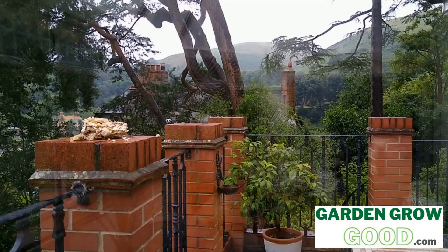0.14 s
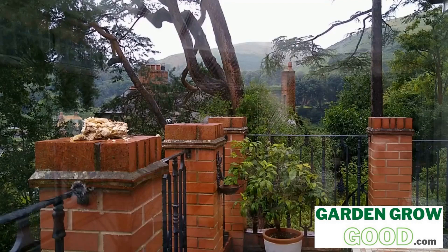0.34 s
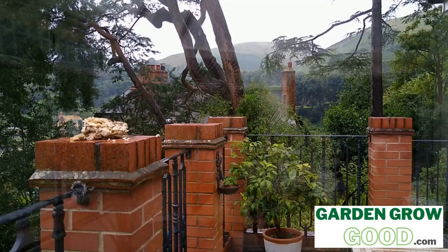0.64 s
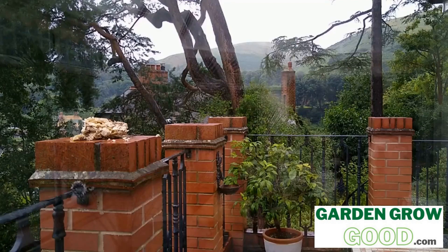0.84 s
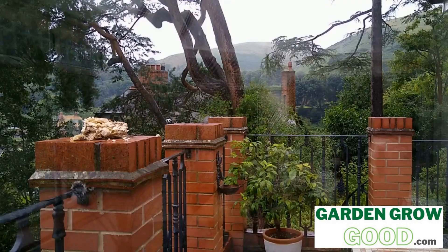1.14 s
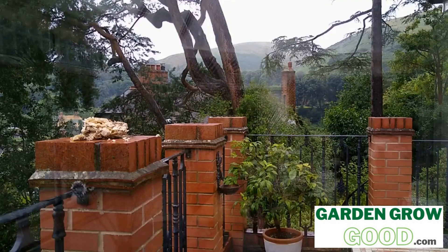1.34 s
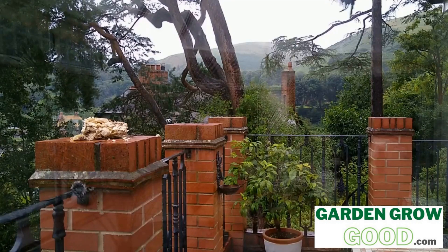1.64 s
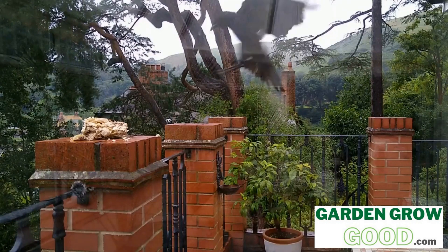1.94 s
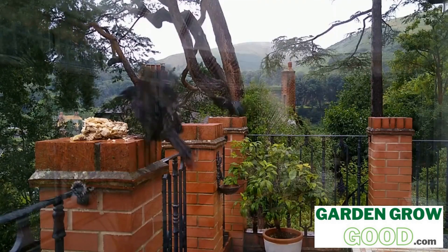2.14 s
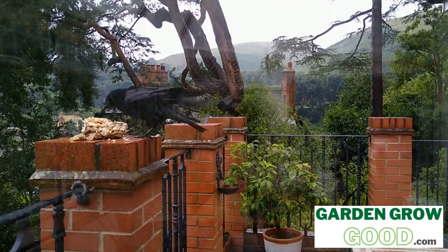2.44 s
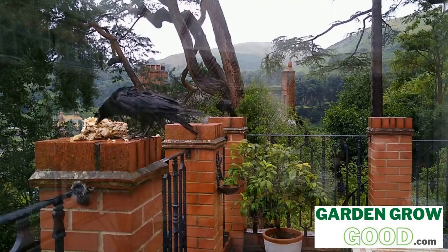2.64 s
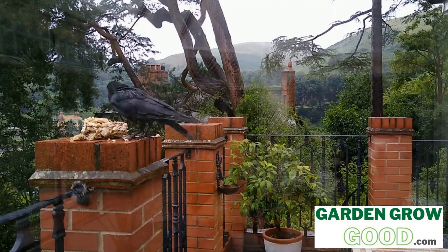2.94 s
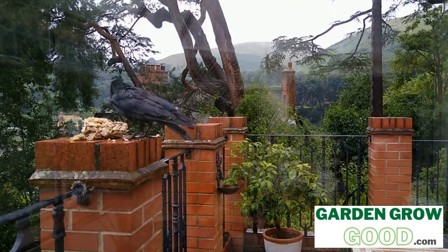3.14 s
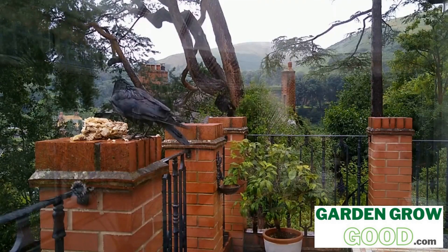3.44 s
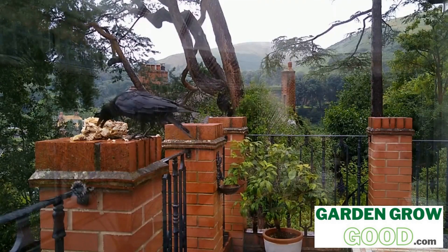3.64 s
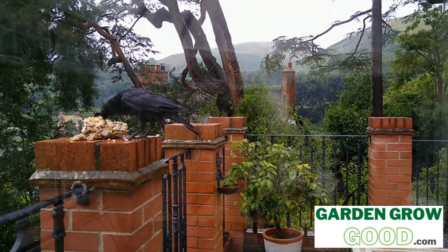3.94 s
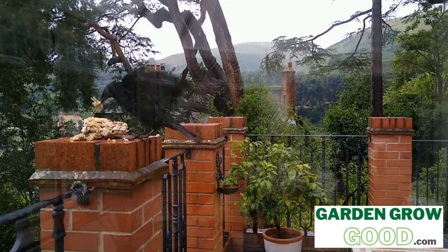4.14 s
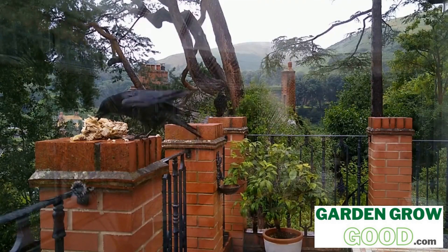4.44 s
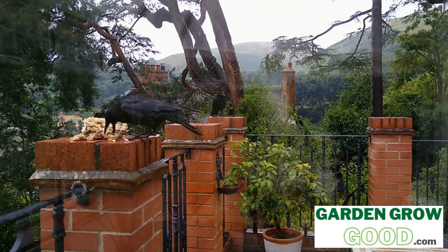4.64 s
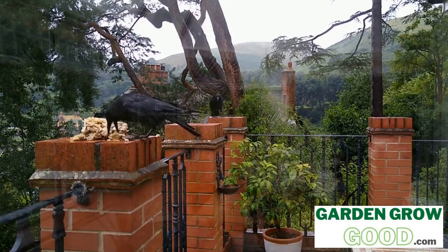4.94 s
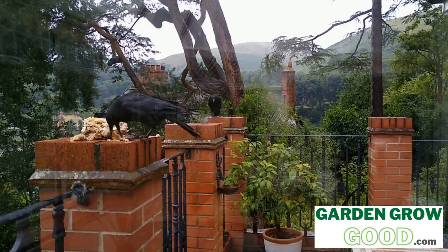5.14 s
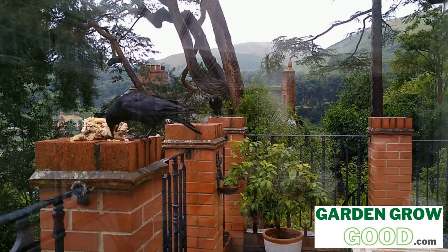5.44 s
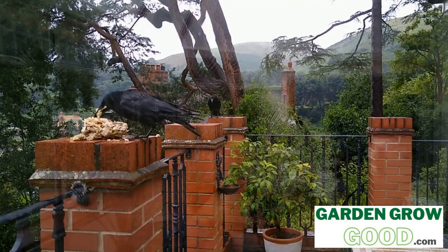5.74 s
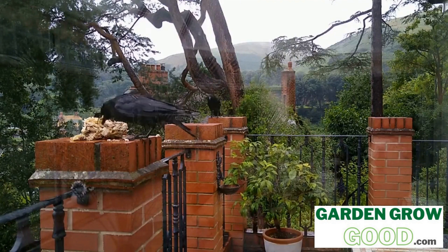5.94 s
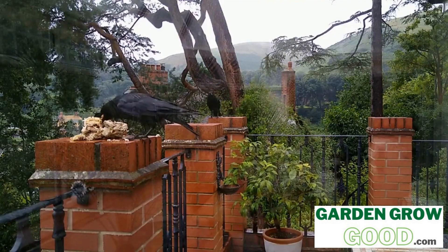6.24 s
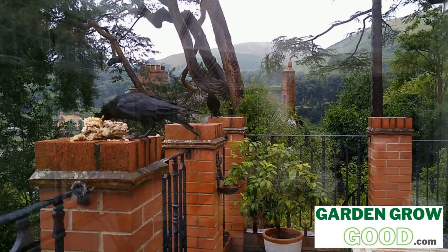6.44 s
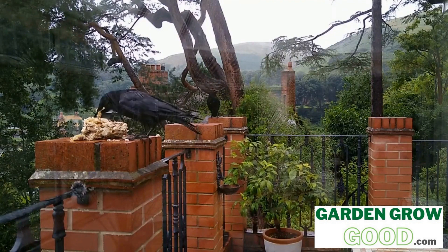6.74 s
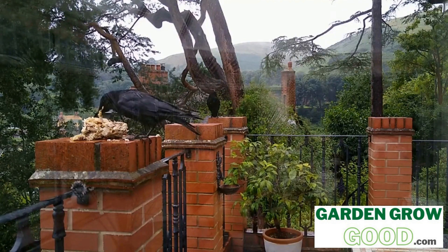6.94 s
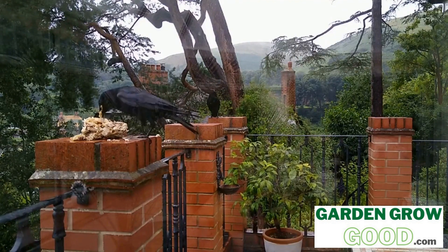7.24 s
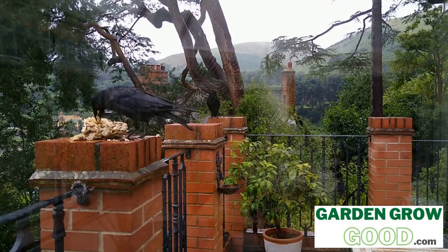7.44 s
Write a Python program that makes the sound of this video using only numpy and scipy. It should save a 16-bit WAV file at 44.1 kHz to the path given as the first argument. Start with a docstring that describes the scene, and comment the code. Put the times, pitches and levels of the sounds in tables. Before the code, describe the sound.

Outdoors, with a soft low wash of valley air and tiny birds trilling far away among trees, a crow calls twice, rough and strong, the caws ringing slightly in the woods. It flutters in close with airy thumps and feather swishes, folds its wings, then picks at crumbly food in sparse, faint, sharp ticks. The caws are by far the loudest sounds.

```python
"""Over the low hum of the valley, with small birds singing far off among the trees, a crow caws twice
in a hillside garden: rough pulses sound through moving resonances. It then flaps down onto a brick
pillar near the microphone, in bursts of low and bright noise, and its feathers rustle as the wings close.
Last it pecks at dry food scraps, in clusters of tiny noise cracks, and tears one loose.
The far birds are gliding sine tones; the hum is filtered noise."""
import sys
import numpy as np
from scipy import signal
from scipy.fft import rfft, irfft
from scipy.io import wavfile
from scipy.ndimage import uniform_filter1d

SR = 44100
rng = np.random.default_rng(int(sys.argv[2]) if len(sys.argv) > 2 else 0)


def wav_record(signal):
    """Record a signal, one row per channel, as 16-bit PCM in the file named by sys.argv[1]."""
    frames = np.transpose(np.atleast_2d(signal))
    bounded = np.clip(frames, -1, 1)
    # unit amplitude maps onto the largest positive 16-bit level
    quanta = np.round(bounded * 32767).astype(np.int16)
    wavfile.write(sys.argv[1], SR, quanta)


N = 335160
TIME = np.arange(N) / SR


def gain_of(db):
    """Turns decibels into an amplitude factor."""
    return 10 ** (np.asarray(db) / 20)


def evened(x):
    """Scales to rms 1."""
    return x / np.sqrt(np.mean(x ** 2) + 1e-20)


def read(points, hz):
    """Reads a curve of (frequency, value) points on a log-frequency axis."""
    f, value = np.transpose(points)
    return np.interp(np.log(hz + 1), np.log(f + 1), value)


def add(mix, s, sound):
    """Mixes a sound in at a time in seconds."""
    part = mix[max(round(s * SR), 0):][:len(sound)]
    part += sound[:len(part)]


def coloured(x, points):
    """Filters x by a spectrum in dB and scales it to rms 1."""
    gain = gain_of(read(points, np.fft.rfftfreq(len(x), 1 / SR)))
    return evened(irfft(rfft(x) * gain, len(x)))


def wander(count, hz):
    """Random drift, mostly slower than a given rate, rms 1."""
    f = np.fft.rfftfreq(count, 1 / SR)
    lowpass = (f > 0) / (1 + (f / hz) ** 2) ** 2
    return evened(irfft(rfft(rng.standard_normal(count)) * lowpass, count))


def bell(s, length):
    """A smooth rise and fall of height 1 around a time."""
    return np.exp(-2 * ((TIME - s) / length) ** 2)


def patches(shape, size):
    """Random blotches over frequency and time, rms 1."""
    across_frequency = uniform_filter1d(rng.standard_normal(shape), size[0], 0)
    return evened(uniform_filter1d(across_frequency, size[1], 1))


def valley_and_low_air():
    """A soft wash of distant air and roads, over a lumpy low rumble that also carries the wings' push."""
    # colour of the wash: (frequency [Hz], level [dB])
    wash_colour = [(12, -48), (20, -26), (31, -14), (53, -1.5), (137, -2.5), (202, -5), (252, -5.5),
                   (298, -4.5), (382, -3.5), (416, -6), (631, -5.5), (1720, -17.5), (3450, -23),
                   (11400, -27), (15500, -26.5)]
    # low swells; the one near 2.1 s is air pushed by the wings: (middle [s], length [s], level [dB])
    swell_rows = [(1.083, 0.13, -63), (2.12, 0.32, -53), (5.156, 0.21, -66), (6.24, 0.26, -65)]
    wash_db, rumble_db, rumble_drift_db = -58.5, -67.5, 3
    drift_db = .4 * wander(N, 4)
    wash = gain_of(wash_db + drift_db) * coloured(rng.standard_normal(N), wash_colour)
    low_colour = [(20, -39), (40, -14.0), (57, 1.5), (80, -5), (140, -43), (600, -73)]  # (Hz, dB)
    low_air = coloured(rng.standard_normal(N), low_colour)
    swells = sum(gain_of(db) * bell(s, length) for s, length, db in swell_rows)
    return wash + low_air * (gain_of(rumble_db + rumble_drift_db * wander(N, 2.5)) + swells)


def woods(x):
    """Trunks and leaves scatter sound into a tail; each band dies at its own speed."""
    # decay over frequency: (frequency [Hz], time to fall by 60 dB [s])
    decay = [(300, 0.94), (1500, 0.56), (3500, 0.8), (6000, 0.96), (12000, 0.41)]
    hz, t, z = signal.stft(rng.standard_normal(SR), SR, nperseg=256)
    fade = gain_of(-60 * t / read(decay, hz)[:, None])
    tail = signal.istft(z * fade, SR, nperseg=256)[1]
    return signal.fftconvolve(x, tail / np.linalg.norm(tail))[:N]


def song(slurs_per_s=22, warble=0.0306):
    """Far birds pour out quick runs of downward slurs that widen and swell mid-phrase."""
    # phrases: (start [s], length [s], level before distance [dB], top of the slurs at mid-phrase [Hz],
    # their bottom [Hz], drift of both over the phrase [Hz])
    phrases = [(0.329, 0.36, -61.5, 5430, 4340, 0), (0.354, 0.77, -65.5, 3685, 3050, 0),
               (1.0, 0.47, -66, 4440, 2930, 0), (2.419, .84, -62, 4705, 3243, -700),
               (5.021, .62, -65.5, 3657, 2910, 330.5), (5.868, .86, -61, 5390, 3017, 399.5),
               (6.206, 0.34, -61.5, 5390, 4940, -2), (7.038, 0.82, -62, 4640, 3154, -100)]
    # a phrase starts and ends softer, with narrower slurs
    edge_db, edge_sweep = -8, .68
    out = np.zeros(N)
    for s, length, db, top_hz, bottom_hz, drift_hz in phrases:
        u = np.linspace(-1, 1, int(length * SR))
        sweep_hz = (top_hz - bottom_hz) * (1 - (1 - edge_sweep) * u ** 2)
        # place within each slur, from 0 to 1
        slur = np.cumsum(slurs_per_s * (1 + .15 * wander(len(u), 12))) / SR % 1
        hz = bottom_hz + drift_hz * ((u + 1) / 2) ** 2 + sweep_hz * (1 - slur)
        hz = hz * (1 + warble * wander(len(u), 720))
        gate = np.sqrt(abs(np.sin(np.pi * slur)))
        whistle = gate * np.sin(2 * np.pi * np.cumsum(hz) / SR)
        add(out, s, gain_of(db + edge_db * u ** 2) * evened(whistle))
    return out


def chirps():
    """Thin whistles from small birds, alone or in even runs, each a bowed glide."""
    # runs of like notes: (start [s], notes [count], spacing [s], note length [s],
    # level before distance [dB], first pitch [Hz], last pitch [Hz], upward bow [Hz])
    runs = [(3.158, 1, 0, 0.2, -68.5, 6780, 6867, -130), (4.989, 6, 0.067, .04, -61, 3350, 3393, 55),
            (5.713, 1, 0.009, 0.096, -69, 6800, 6660, 6), (5.917, 4, 0.052, .03, -59, 4420, 3000, -60),
            (6.359, 2, .085, .037, -60, 4260, 2750, -100), (7.332, 1, 0, .023, -58, 4900, 6560, 1070),
            (7.47, 2, 0.082, .047, -66, 7200, 5800, -80)]
    run_edge_db = -9.5  # the outer notes of a run are softer
    out = np.zeros(N)
    for s, count, spacing, length, db, first_hz, last_hz, bow_hz in runs:
        u = np.linspace(0, 1, int(length * SR))
        glide_hz = first_hz + (last_hz - first_hz) * u + bow_hz * np.sin(np.pi * u)
        for k in range(round(count)):
            hz = glide_hz * (1 + 0.0054 * wander(len(u), 150))
            edge_db = run_edge_db * ((2 * k + 1) / count - 1) ** 2
            whistle = np.sin(np.pi * u) * np.sin(2 * np.pi * np.cumsum(hz) / SR)
            add(out, s + k * spacing, gain_of(db + edge_db) * evened(whistle))
    return out


def far_birds():
    """Distance softens the birds and blends them with the scatter of the woods."""
    singers, callers = song(), chirps()
    direct = gain_of(-13.0) * singers + gain_of(-5.5) * callers
    return direct + woods(gain_of(-1.5) * singers + gain_of(-9.0) * callers)


def terrace(x, echo_db=-9, fade_s=0.016):
    """Narrow brick pillars return a spray of early echoes; long waves bend around them."""
    t = np.arange(3000) / SR
    taps = rng.choice([-1, 1], len(t)) * (rng.random(len(t)) < .02) * np.exp(-t / fade_s)
    taps = signal.lfilter(*signal.butter(2, 1700, "high", fs=SR), taps)
    return x + gain_of(echo_db) * signal.fftconvolve(x, taps / np.linalg.norm(taps))[:len(x)]


def tearing(count=8, scatter_s=0.012, scatter_db=3.0):
    """A scrap comes loose in an uneven run of cracks that tends louder, as rows like the pecks."""
    start_s, end_s, first_db, last_db = 4.15, 4.43, -63, -61.5
    crack_s, crack_hz = 0.034, 4200
    rows = []
    for u, (late, loud) in zip(np.linspace(0, 1, count), rng.standard_normal((count, 2))):
        s = start_s + u * (end_s - start_s) + scatter_s * late
        db = first_db + u * (last_db - first_db) + scatter_db * loud
        rows.append((s, db, crack_s, crack_hz))
    return rows


def pecks(crumb_db=4, octaves=0.91):
    """Dry food breaks under the beak in short clusters of tiny cracks."""
    # beak on the food: (time [s], level [dB], length scale [s], centre [Hz])
    peck_rows = [(2.695, -60, .004, 4500), (4.22, -52, 0.0025, 3480), (4.367, -59.5, .045, 3800),
                 (4.697, -57, 0.0095, 2920), (4.773, -49.5, 0.019, 4170), (4.829, -49, 0.0016, 4000),
                 (5.215, -57, 0.0027, 4300), (5.358, -57.5, 0.0042, 2800), (6.16, -57, .003, 6000),
                 (7.473, -56, .003, 7000)]
    out, t = np.zeros(N), np.arange(-2048, 4096) / SR
    f = np.fft.rfftfreq(len(t), 1 / SR)
    for s, db, length, hz in peck_rows + tearing():
        # a few samples stick out as crumbs
        crumbs = gain_of(crumb_db * np.minimum(rng.exponential(1, len(t)), 4))
        cracks = rng.standard_normal(len(t)) * crumbs
        band = 1 / (1 + (np.log2((f + 1) / hz) / octaves) ** 2)
        crunch = evened(irfft(rfft(cracks) * band))
        # quick swell before the peck, slower fall after it
        shape = np.exp(np.minimum(t / (0.21 * length), -t / (0.75 * length)))
        add(out, s + t[0], gain_of(db) * crunch * shape)
    return out


def wings(flutter_db=1.36):
    """Each stroke pushes air at the microphone and makes the feathers swish; then the wings close."""
    # wingbeats: (middle [s], swish length [s], air push level [dB], feather swish level [dB])
    wingbeats = [(1.749, 0.12, -51, -54), (1.872, 0.038, -46.5, -62.5), (1.941, 0.078, -51.5, -55),
                 (2.038, 0.064, -47, -53.5), (2.113, 0.048, -50, -59.5), (2.185, 0.064, -46.5, -51.5),
                 (2.236, 0.038, -51.5, -56), (2.278, 0.024, -47, -58)]
    # colour of the pushed air: (frequency [Hz], level [dB])
    air_colour = [(20, -27), (45, -0.5), (100, -3), (200, -3), (400, -8), (800, -12.5), (1600, -25),
                  (4000, -47)]
    # colour of the feathers: (frequency [Hz], level [dB])
    feather_colour = [(300, -12), (1000, 3), (2000, 5), (3200, 1.5), (5800, 4.5), (9000, -1), (15000, -8.5)]
    push_share = 0.89  # the push of air is briefer than the swish
    fold_s, fold_length_s, fold_db = 2.352, 0.12, -62  # feathers rustle as the wings close
    push = sum(gain_of(air_db) * bell(s, push_share * length) for s, length, air_db, _ in wingbeats)
    swish = sum(gain_of(feather_db) * bell(s, length) for s, length, _, feather_db in wingbeats)
    swish = swish + gain_of(fold_db) * bell(fold_s, fold_length_s)
    air = coloured(rng.standard_normal(N), air_colour)
    feathers = coloured(rng.standard_normal(N), feather_colour)
    return push * air + swish * feathers * gain_of(flutter_db * wander(N, 150))


def syrinx(hz, rough, jitter, shimmer_db, rasp, half_share=0.03, rattle_hz=58, rattle_db=1.0):
    """Uneven pulses, now and then strong and weak in turn, each with a puff of air."""
    count = len(hz)
    # cycle-to-cycle jitter leaves the low harmonics clear and smears the high ones
    turns = np.cumsum(hz * (1 + 2 * rough * jitter * wander(count, 223))) / SR
    pulses = evened(sum(np.cos(2 * np.pi * k * turns) for k in range(1, 52)))
    pulses *= 1 + 2 * rough * half_share * wander(count, 31) * np.cos(np.pi * turns)
    air = coloured(rng.standard_normal(count), [(400, -9), (1000, 9), (1800, 11.0), (8000, 6.0)])
    puffs = evened((0.087 + np.exp(-(turns % 1) / 0.78)) * air)
    # the two sides of the syrinx beat against each other in a loose rattle
    rattle = np.sin(2 * np.pi * np.cumsum(rattle_hz * (1 + 0.22 * wander(count, 33))) / SR)
    flicker_db = shimmer_db * np.tanh(wander(count, 88)) + rattle_db * rattle
    return (pulses + rasp * rough * puffs) * gain_of(flicker_db)


def caw(row, tune, beak, throat, jitter, shimmer_db, rasp, formant_db, upper_db, shoulder, shoulder_db,
        formant_width_hz=170, upper_width_hz=210, chest=0.075, sizzle=0.96, bright=0.37, ring=1.7,
        quaver_db=.5):
    """The syrinx sounds through a throat and beak whose resonances move as the bird calls."""
    # hollows that part the resonances: (frequency [Hz])
    hollows = [0, 2700, 4700, 6600, 16000]
    rough_at_top, rough_per_octave = 0.32, 1.13  # the voice roughens as its pitch sags
    # the voice throbs briefly at the crest of the first caw
    throb_s, throb_length_s, throb_per_s, throb_db = .401, 0.044, 55, 3.5
    start, length, top_db, attack_s, crest_s, swell_db, sag_db, release_s, open_s = row
    age = np.arange(0, length, 1 / SR)
    t = start + age

    # effort swells to a crest and sags, between a quick attack and a release
    edge = np.clip(np.minimum(age / attack_s, (length - age) / release_s), .06, 1)
    edge_db = 20 * np.log10(edge)
    before_db = swell_db * (1 - age / crest_s) ** 2
    after_db = sag_db * ((age - crest_s) / (length - crest_s)) ** 2
    effort_db = top_db + edge_db - np.where(age < crest_s, before_db, after_db)

    tune_s, tune_hz, tune_formant_hz = np.transpose(tune)
    hz, formant_hz = np.interp(t, tune_s, tune_hz), np.interp(t, tune_s, tune_formant_hz)
    rough = rough_at_top + rough_per_octave * np.log2(hz.max() / hz)
    opening = 1 - np.exp(-age / open_s)
    drive = terrace(syrinx(hz, np.clip(rough, .15, .8), jitter, shimmer_db, rasp))
    f, at, z = signal.stft(drive, SR, nperseg=512, noverlap=448)
    f, at = f[:, None], at + t[0]

    def hump(centre, width):
        """A resonance of height 1 that follows a curve."""
        return 1 / (1 + ((f - np.interp(at, t, centre)) / width) ** 2)

    # the lowest and highest harmonics fill out only at full effort
    below_top_db = np.interp(at, t, effort_db) - effort_db.max()
    thin_db = below_top_db * (chest * (f < 1200) + sizzle * (f > 9000))
    # a weaker resonance rides just above the main one
    colour_db = read(throat, f) + thin_db + shoulder_db * hump(shoulder * formant_hz, formant_width_hz)
    # the overtones are ragged: their strength and timing drift in blotches
    ragged = np.clip(f / 3000, 0, 1.1)
    blotch_db, smear = 3.5 * patches(z.shape, size=(3, 36)), 1.1 * patches(z.shape, size=(4, 40))
    z = z * gain_of(colour_db + ragged * blotch_db) * np.exp(1j * ragged * smear)

    # the main resonance stands out most when the bird calls hardest
    focus = gain_of(0.27 * below_top_db)
    resonances = [(formant_hz, effort_db, formant_db * focus, formant_width_hz)]
    # the upper resonances come in later and die sooner than the main one
    for first_hz, open_hz, first_db, open_db in beak:
        centre = first_hz + (open_hz - first_hz) * opening
        db = effort_db + bright * edge_db + first_db + (open_db - first_db) * opening
        resonances.append((centre, db, upper_db, upper_width_hz))
    voice = 0
    for (centre, db, height_db, width), low, high in zip(resonances, hollows, hollows[1:]):
        peak = gain_of(height_db * hump(centre, width)) * (f >= low) * (f < high)
        # each pulse rings on in the resonance
        lag = np.exp(-1j * ring * np.arctan((f - np.interp(at, t, centre)) / width))
        part = signal.istft(z * peak * lag, SR, nperseg=512, noverlap=448)[1][:len(t)]
        # level the band over about 23 ms, so that it follows its own level curve
        running_rms = np.sqrt(uniform_filter1d(part ** 2, size=1000) + 1e-12)
        voice = voice + gain_of(db + quaver_db * wander(len(t), 31)) * part / running_rms

    throb = np.exp(-2 * ((t - throb_s) / throb_length_s) ** 2)
    throb = throb * np.cos(2 * np.pi * throb_per_s * (t - throb_s))
    return start, voice * gain_of(throb_db * throb) * signal.windows.tukey(len(t), .03)


def crow_calls():
    """Two caws, each with its own intonation, throat and opening beak, ring on among the woods."""
    # caws: (start [s], length [s], level [dB], attack [s], loudest after [s], swell up to there [dB],
    # sag after it [dB], release [s], beak opening time [s])
    caws = [(.135, .456, -28.5, .026, 0.22, 14.5, 4.5, 0.062, 0.092),
            (1.291, .43, -31, 0.029, 0.16, 8.5, 11, 0.042, 0.21)]
    # intonation of each caw: (time [s], pitch [Hz], main throat resonance [Hz])
    tune_1 = [(.188, 296.5, 1490), (.25, 335.5, 1870), (.29, 323.2, 1740), (.345, 313.8, 1650),
              (.387, 331, 1800), (.452, 307.7, 1610), (.51, 303.6, 1540), (.552, 269, 1480),
              (.585, 248, 1480)]
    tune_2 = [(1.294, 307.4, 1420), (1.35, 333.8, 1810), (1.377, 365, 1290), (1.402, 363.8, 1300),
              (1.425, 349.4, 1700), (1.525, 339, 1740), (1.6, 315, 1670), (1.635, 292, 1620),
              (1.7, 270, 1650)]
    # three upper resonances that glide as the beak opens: (first [Hz], open [Hz],
    # first level against the main resonance [dB], open level against it [dB])
    beak_1 = [(4100, 3520, -8.5, -9.5), (4930, 5650, -17.5, -10), (7300, 7870, -4.5, -19.5)]
    beak_2 = [(3510, 3800, -12.5, -13), (4980, 6220, -13, -6.5), (7240, 8400, -22.5, -14.5)]
    # throat and beak colour of each caw: (frequency [Hz], level [dB])
    throat_1 = [(300, -28), (640, -6), (950, -2.5), (1280, -10), (1600, -1), (1900, -6.5), (2250, -2.5),
                (2650, -10), (3600, -15), (4600, -13), (5700, -20), (6700, -17.5), (7900, -23.5),
                (9500, -24), (11500, -26.5), (15500, -41)]
    throat_2 = [(300, -26), (600, 0), (740, -16.5), (900, 2), (1080, 1.5), (1240, -11), (1430, -4.5),
                (1750, -0.5), (2400, -10.5), (4600, -14.5), (5700, -10.5), (8500, -21), (10500, -28.5),
                (15500, -50.5)]
    crow = np.zeros(N)
    add(crow, *caw(caws[0], tune_1, beak_1, throat_1, jitter=0.0244, shimmer_db=2.0, rasp=0.63,
                   formant_db=17.0, upper_db=12.0, shoulder=1.22, shoulder_db=7))
    add(crow, *caw(caws[1], tune_2, beak_2, throat_2, jitter=0.0271, shimmer_db=2.0, rasp=0.85,
                   formant_db=15.5, upper_db=11, upper_width_hz=200, shoulder=1.18, shoulder_db=7.0))
    return crow + gain_of(-21) * woods(crow)


def scene():
    """Everything reaches the microphone as one centred sound."""
    mix = valley_and_low_air() + far_birds() + terrace(pecks()) + wings() + crow_calls()
    return np.tile(mix, (2, 1))


def record(dry):
    """A thin whine, a faint random difference between left and right in the top treble, a band limit."""
    # side level over frequency: (frequency [Hz], side level [dB])
    side_levels = [(3000, -80), (6000, -65), (8000, -15.5), (9500, -10.5), (15000, -9.5)]
    whine_hz, whine_db, edge_hz = 11849, -83, 15750
    whine_phase = 2 * np.pi * np.cumsum(whine_hz + 12 * wander(N, 50)) / SR
    whine = gain_of(whine_db) * evened(np.sin(whine_phase))
    side_gain = gain_of(read(side_levels, np.fft.rfftfreq(N, 1 / SR)))
    side = irfft(rfft(dry[0]) * side_gain, N) * wander(N, 140)
    wet = dry + whine + np.array([side, -side])
    lowpass = signal.firwin(511, edge_hz, window=("kaiser", 9), fs=SR)
    return signal.oaconvolve(wet, lowpass[None], "same")


dry = scene()
out = record(dry)
wav_record(out)
```